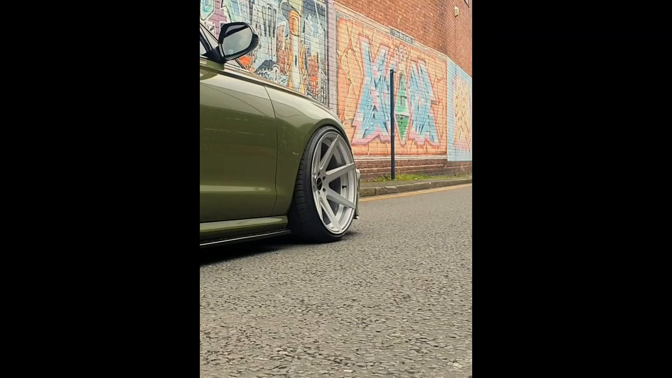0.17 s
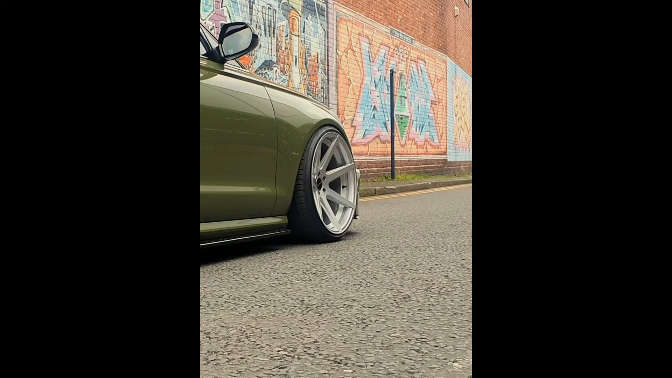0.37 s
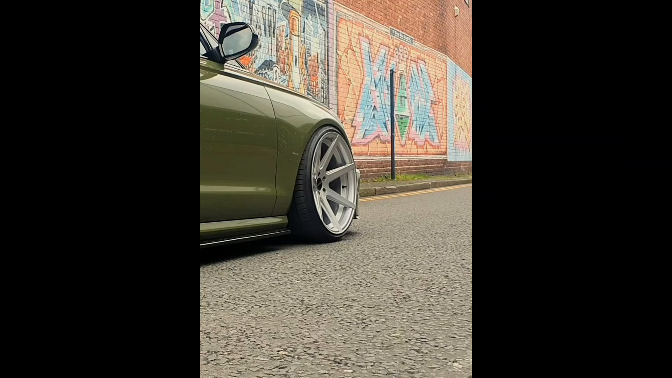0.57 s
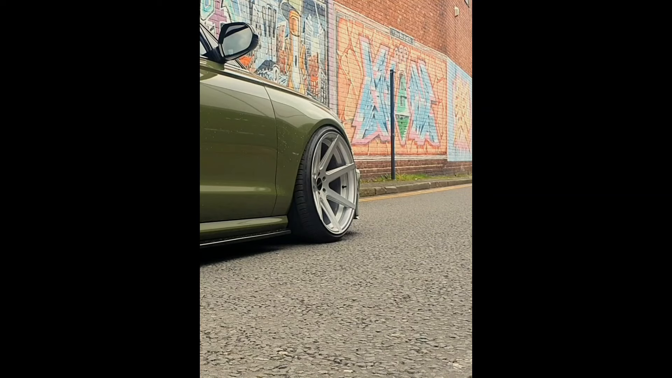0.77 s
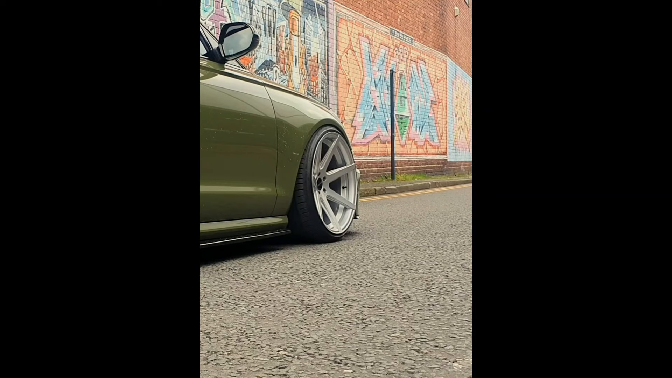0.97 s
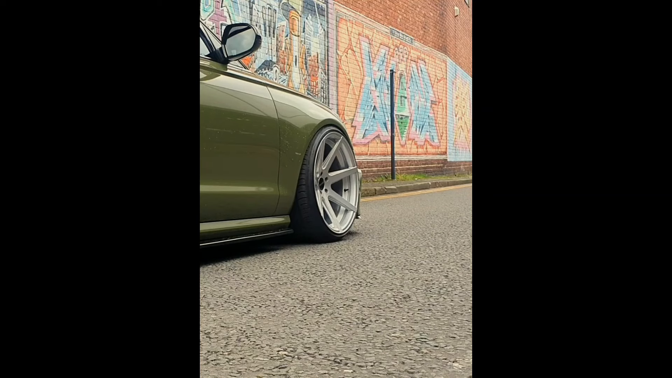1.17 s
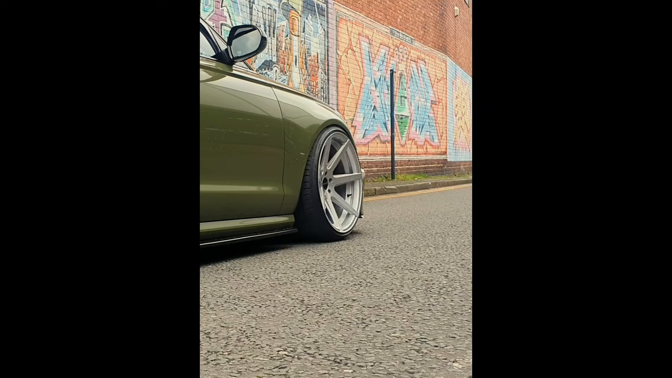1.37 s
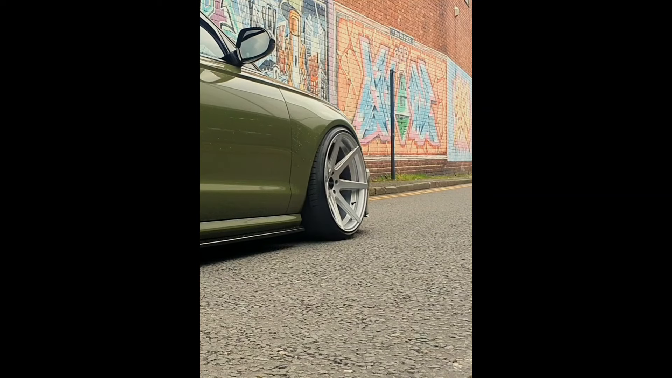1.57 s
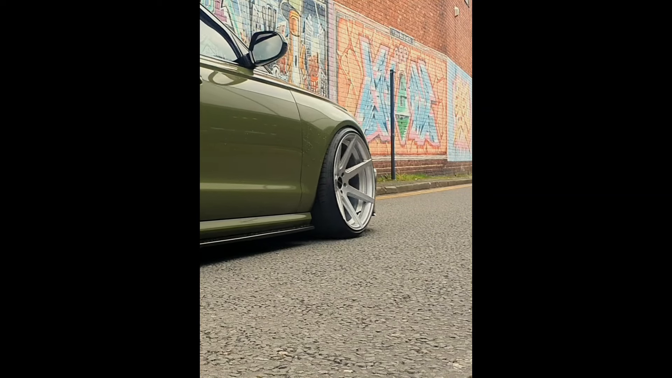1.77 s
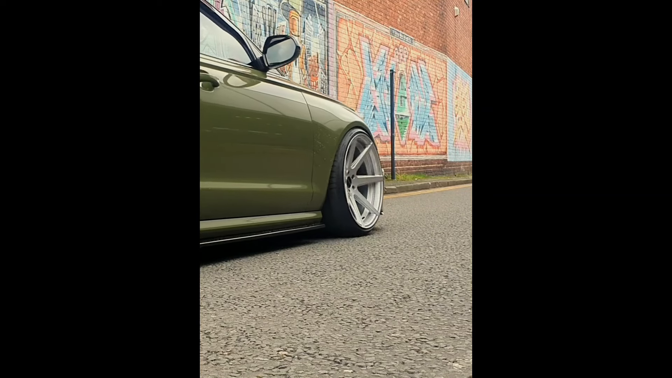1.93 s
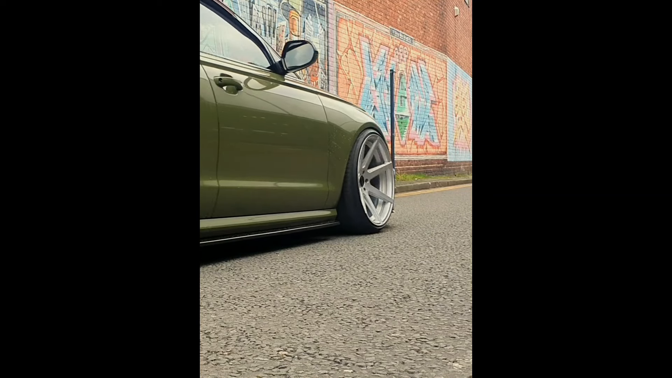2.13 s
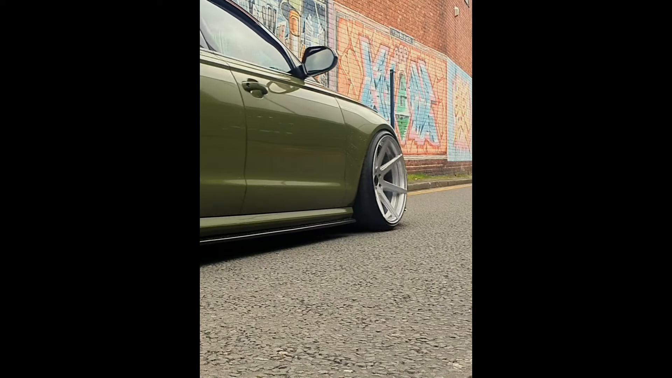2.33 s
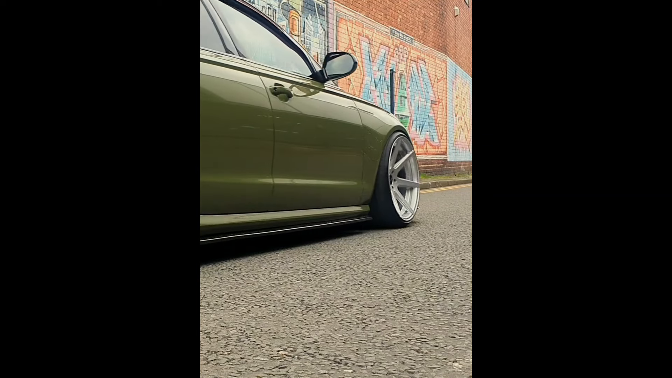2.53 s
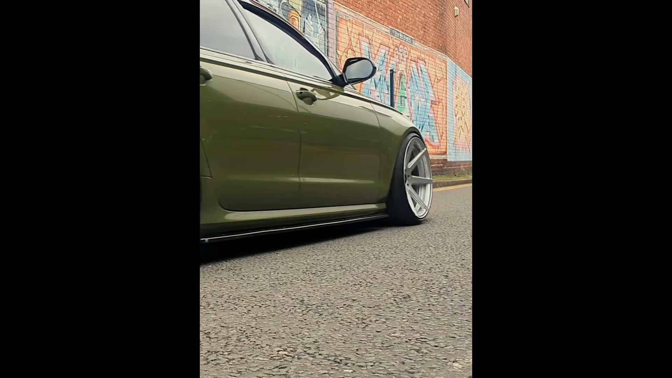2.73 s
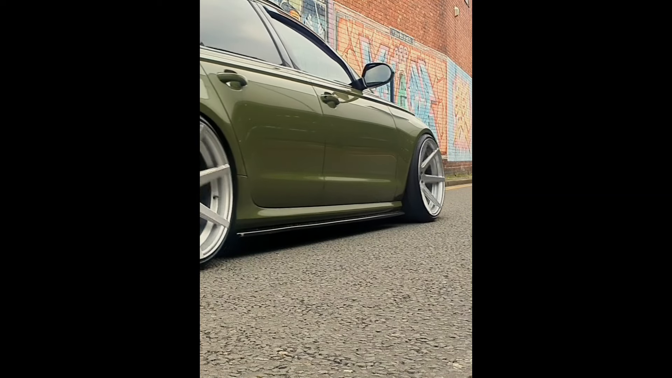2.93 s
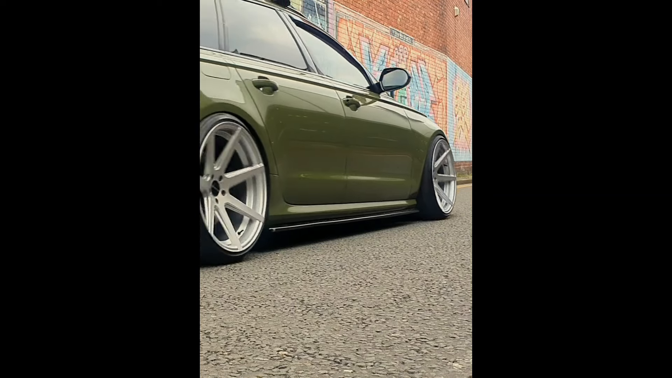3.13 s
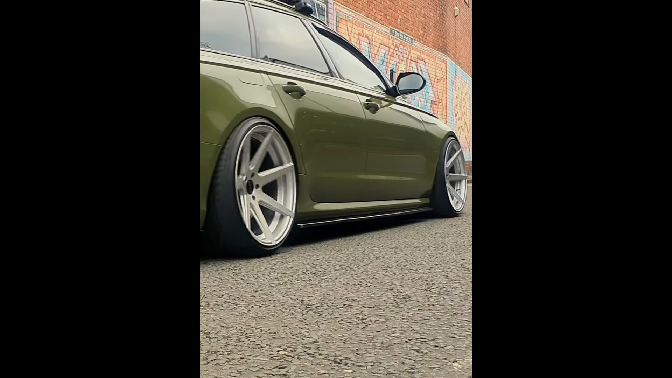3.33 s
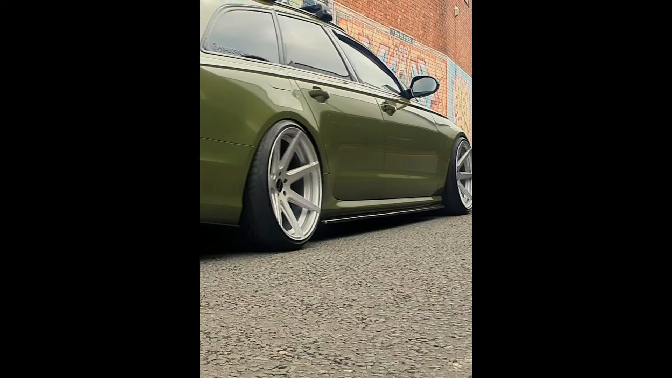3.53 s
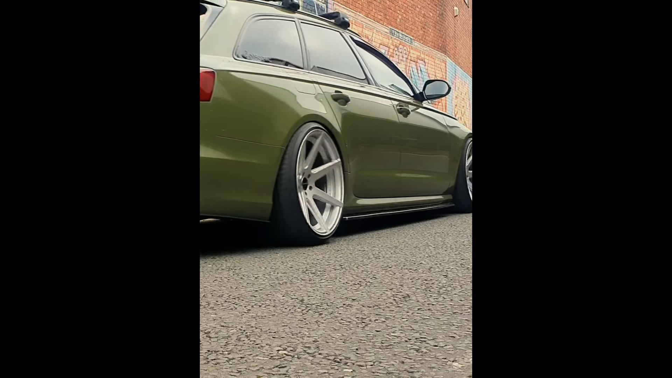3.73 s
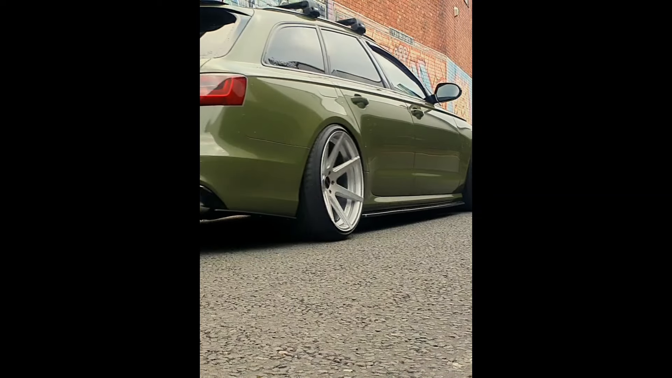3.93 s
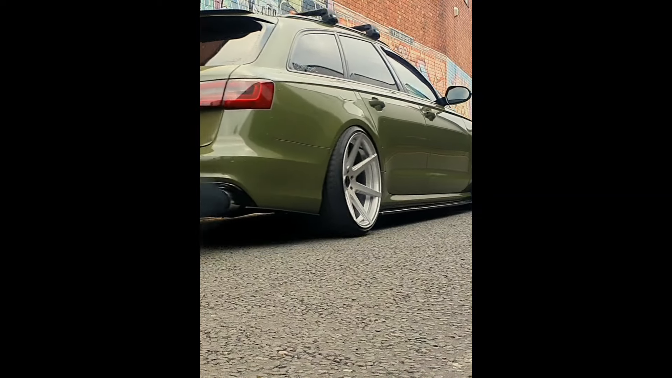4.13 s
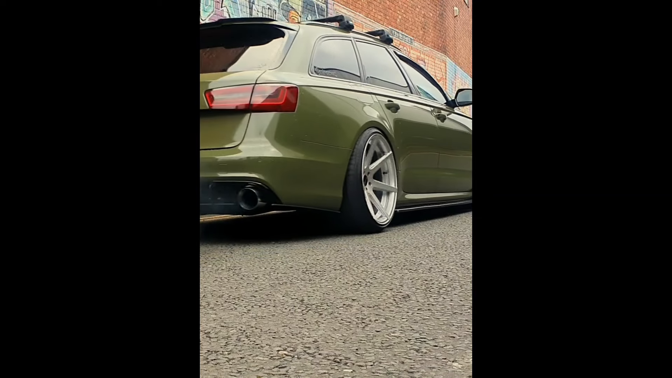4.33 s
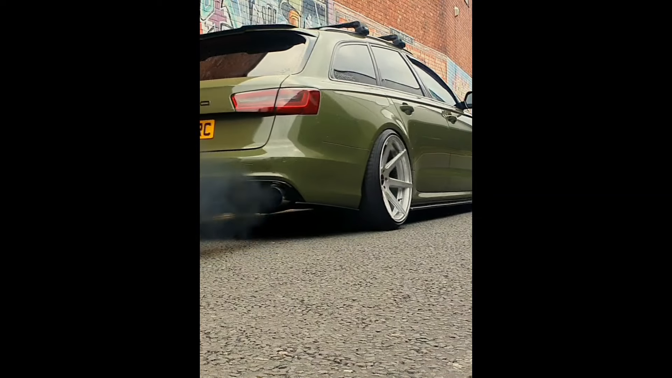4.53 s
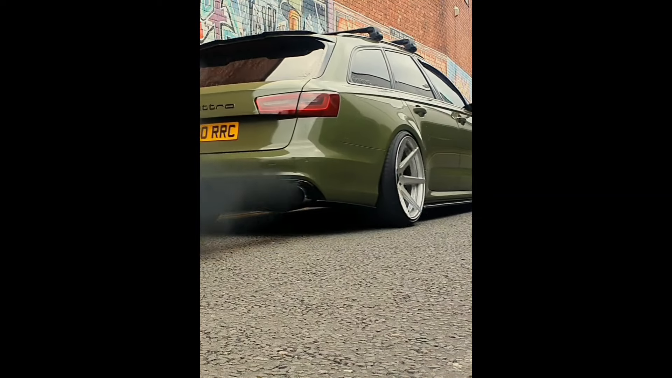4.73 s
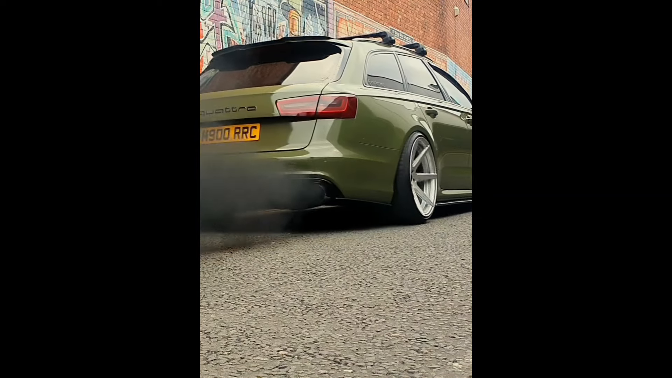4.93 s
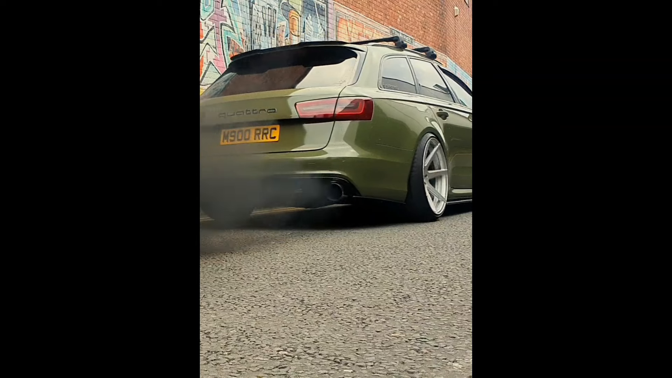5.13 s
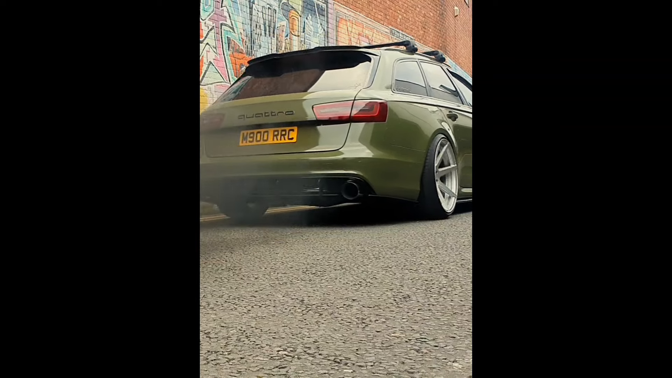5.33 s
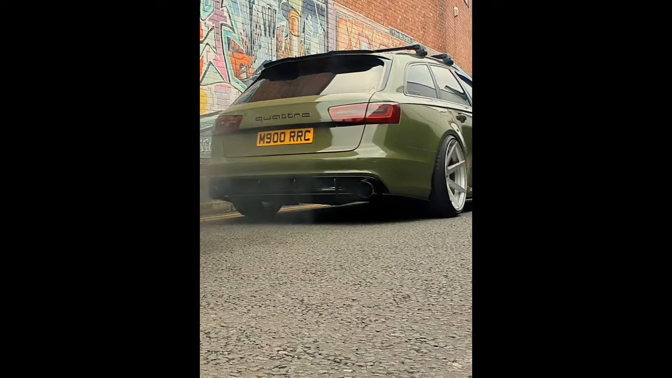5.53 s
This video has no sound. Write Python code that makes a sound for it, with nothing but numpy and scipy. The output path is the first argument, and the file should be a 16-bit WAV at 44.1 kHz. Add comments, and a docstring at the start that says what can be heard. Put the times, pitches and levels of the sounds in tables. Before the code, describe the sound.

Steady rumbling diesel idle through a loud exhaust, then a sudden floored throttle, turbo rush, limiter pops and a final clean blare.

```python
"""A six-cylinder diesel with an open exhaust idles in a walled street while the microphone moves from nose to tail.
Each firing feeds the pipe: slow ones hum as harmonics, fast ones are pulses ringing it, with rasp and hiss.
The driver floors it: the turbo rushes, the revs shoot up to the limiter, and unburnt fuel bangs and crackles.
Then the revs sag and the engine pulls again with a clean blare. Behind it, at idle only, are clattering metal,
intake air, a turbo whisper and a gear whine. The loud sounds echo off the street."""
import sys
import numpy as np
from scipy import signal
from scipy.fft import rfft, irfft, next_fast_len
from scipy.io import wavfile
from scipy.ndimage import uniform_filter1d

SR = 44100
rng = np.random.default_rng(int(sys.argv[2]) if len(sys.argv) > 2 else 0)


def inscribe(sig):
    """Save sig as 16-bit PCM at rate SR to the path in sys.argv[1].

    A 1-D sig is mono; a 2-D sig holds one channel per row.
    Samples are clipped to [-1, 1] before scaling.
    """
    pcm = np.round(np.clip(np.atleast_2d(sig).T, -1, 1) * 32767)
    wavfile.write(sys.argv[1], SR, pcm.astype(np.int16))


N = 251237
TIME = np.arange(N) / SR

# Engine speed at idle. Each row: time in seconds, firings per second.
IDLE_SPEED = [(0, 41.4), (.4, 41.9), (.95, 41.7), (1.2, 41.1), (1.6, 40.8), (1.85, 40.5), (2.05, 40.1),
              (2.32, 41.5), (2.65, 43.5), (3.13, 42.4), (3.3, 41.5), (3.48, 44.8)]
# Engine speed under throttle. Each row: time in seconds, firings per second, unevenness from 0 to 1.
REV_SPEED = [(3.51, 59, 0.5), (3.56, 85.5, 0.47), (3.63, 100, 0.39), (3.81, 156.5, 0.48), (4.0, 208.6, .25),
             (4.098, 259, .45), (4.289, 246, 0.71), (4.5, 235, 0.48), (4.619, 276, 0.95), (4.749, 246, .8),
             (4.851, 272, 0.58), (5.18, 270, 0.79), (5.299, 245, 0.6), (5.5, 225, 0.37), (5.7, 216, 0.01)]
# Load on the engine once the throttle is open. Each row: time in seconds, load in dB (0 is full).
LOAD = [(3.42, -28.5), (3.52, -1.5), (3.63, -0.5), (3.74, -0.5), (3.83, 1), (3.93, -6), (4.01, 1),
        (4.18, -13), (4.54, -6), (5.15, -7.5), (5.3, -13.5), (5.53, -16), (5.62, -6.5), (5.7, 0.5)]
# How the exhaust pipe colours the pulses. Each row: frequency in Hz, level in dB.
PIPE_COLOUR = [(25, -56.5), (70, -24), (150, -10), (270, 1.5), (370, -2), (500, 9), (680, 0), (900, -14),
               (1060, -3.5), (1180, -21), (1350, -12.5), (1800, -20), (2500, -31), (6000, -35.5),
               (8500, -85.5), (16000, -100)]
# How strongly the pipe passes the three lowest harmonics. Each row: frequency in Hz, level in dB.
NOTE_COLOUR = [(60, -2.5), (106, -2.5), (132, -13), (178, 1), (210, 0), (240, -4.5), (315, -5.5),
               (380, -24), (500, -13.5), (580, -19), (660, -4), (780, -21)]
# Colour of the rough exhaust rasp. Each row: frequency in Hz, level in dB.
RASP_COLOUR = [(25, -39), (130, -17), (280, 15), (400, 1.5), (700, 8), (1400, -6), (2100, -6.5),
               (2700, -12), (5000, -30.5), (8200, -41), (12000, -40), (16000, -41)]
# Colour of the exhaust hiss, intake air and tick. Each row: frequency in Hz, level in dB.
HISS_COLOUR = [(1500, -25.5), (2600, -10), (3200, 7), (4400, 2), (5800, -2.5), (6700, -6), (7800, -46),
               (10500, -16), (13000, -26), (16000, -30.5)]
# Bangs in the pipe. Each row: time in seconds, crack level in dB, boom level in dB.
BANGS = [(4.0034, -27.5, -21), (4.0746, -33, -9), (4.0989, -38, -13), (4.1315, -32.5, -21.5),
         (4.17, -54, -17.5), (4.2091, -22.5, -7), (4.2567, -25.5, -15.5), (4.353, -25, -12),
         (4.4019, -29.5, -11), (4.5237, -22, -14), (4.537, -26, -10), (4.6129, -20, -12.5),
         (4.6543, -21, -28), (4.6726, -21, -12), (4.7213, -27, -17.5), (4.7713, -20, -10.5),
         (4.8193, -26.5, -13.5), (4.849, -33, -16), (4.8949, -20.5, -9.5), (4.9198, -35, -16),
         (4.9505, -25.5, -38), (4.968, -19, -12), (5.0353, -24.5, -11.5), (5.0859, -34, -17),
         (5.1155, -24, -11), (5.1527, -20.5, -10), (5.2105, -28.5, -15)]
# Colour of a bang's boom. Each row: frequency in Hz, level in dB.
BOOM_COLOUR = [(25, -36.5), (75, -7), (150, -16), (275, 5.5), (370, -17), (520, -2), (660, 0.5),
               (820, -6.5), (1100, -16.5), (2000, -23), (3000, -30.5), (7000, -60)]
# Colour of a bang's crack. Each row: frequency in Hz, level in dB.
CRACK_COLOUR = [(400, -4.5), (1000, 10.5), (2000, 8.5), (2800, 0), (4500, 4), (6200, 2), (7200, -8),
                (8200, -45), (16000, -36)]
# Colour of the snap on top of a crack. Each row: frequency in Hz, level in dB.
SNAP_COLOUR = [(3000, -34), (7000, -3.5), (9000, -2.5), (11500, 4.5), (15000, 1), (17000, -18)]
# Colour of the turbo's rush. Each row: frequency in Hz, level in dB.
RUSH_COLOUR = [(300, -22.5), (1000, 4), (1180, 0.5), (1420, 9.5), (1750, 0.5), (2450, -8), (2900, -0.5),
               (3300, 5), (4400, -6), (5400, 0), (6400, -16), (7600, -30), (10500, -18.5), (16000, -29.5)]
# Idle drone on the pipe's resonance. Each row: time in seconds, level in dB, depth of its beat in dB.
DRONE = [(0, -20.5, 1.5), (.85, -20.5, 3), (1.15, -17, 1.5), (1.55, -16.5, 1.5), (1.8, -18.5, 1.5),
         (2.15, -16, -0.3), (2.55, -19.5, 1), (3.1, -20.5, .6), (3.43, -18, 0.2), (3.5, -15.5, 2.5)]
# Brief sags of the drone. Each row: time in seconds, half length in seconds, depth in dB.
SAGS = [(0.232, 0.015, 8), (0.803, 0.013, 13), (.975, 0.031, 6), (1.942, 0.073, 12.5), (2.292, 0.028, 21),
        (2.4, .015, 17)]
# Idle throb. Each row: time in seconds, gain of the mixed harmonics in dB, sixth harmonic in dB.
THROB = [(0, -39.5, -36.5), (.5, -38.5, -29), (1.05, -34, -28.5), (1.5, -32.5, -41), (1.85, -32, -43.5),
         (2.3, -29.5, -27.5), (2.7, -29, -36), (3.12, -32.5, -41), (3.26, -24.5, -25), (3.5, -23, -40)]
# Harmonics mixed into the throb. Each row: multiple of the firing rate, level in the mix in dB.
IDLE_ORDERS = [(1, -27), (2, 1.5), (3, -2.5), (5, -3), (7, -8.5), (8, -18), (9, -19), (10, -16), (11, -18)]
# Colour of the idle rumble. Each row: frequency in Hz, level in dB.
RUMBLE_COLOUR = [(25, -13), (45, -0.5), (70, 9.5), (110, -8), (200, 6.5), (330, -6.5), (600, -18),
                 (1000, -22), (2000, -61.5)]
# Colour of the injector clatter. Each row: frequency in Hz, level in dB.
CLATTER_COLOUR = [(190, -28.5), (330, -2.5), (352, -13.5), (442, -4), (583, -6), (622, -1), (833, -8),
                  (1270, -8.5), (2000, -12), (2470, -16.5), (3210, -12.5), (3590, -32), (4970, -44.5),
                  (7960, -50), (16000, -45.5)]
# The engine's ringing metal parts. Each row: frequency in Hz, width in Hz, level in the mix in dB.
METAL = [(616, 43, -6), (900, 82, 1.5), (1670, 40, -2), (1946, 52, 2), (2102, 56, 0.5), (2290, 75, -5),
         (3120, 52, -7.5), (3260, 100, -5), (4050, 68, -10.5), (4720, 66, -16.5)]
# Intake air hiss. Each row: time in seconds, level in dB.
AIR = [(.33, -71), (.5, -51), (1, -57.5), (1.8, -62), (2.3, -55), (3.18, -53), (3.26, -62.5), (3.44, -55)]
# Turbo spooling at idle. Each row: time in seconds, centre in Hz, level in dB before a 6 dB lift.
SPOOL = [(0, 2780, -73.5), (1.9, 3430, -59.5), (2.4, 3960, -57), (2.8, 4570, -53), (3.18, 5108, -56.5),
         (3.25, 4988, -71), (5.7, 5060, -86)]
# A gear's whine, tied to the crankshaft. Each row: time in seconds, level in dB before a 2 dB lift.
WHINE = [(0, -58), (1.6, -51.5), (2, -45.5), (2.65, -45.5), (3, -56), (3.25, -79)]
# Hard echoes off the road and the bodywork. Each row: delay in milliseconds, level in dB.
ECHOES = [(2.3, -15.5), (7.4, -23), (13, -15.5)]
# The car seen from the microphone. Each row: time in seconds, lead of the left ear in ms, left-right in dB.
BEARING = [(0, 0.44, 2), (1.7, 0.39, 2.5), (2.7, 0.33, 2.5), (3.3, 0.15, 1.7), (4.2, 0, 2),
           (4.8, -0.052, 1.5), (5.7, 0.009, 1)]
# Difference in colour between the microphone ports. Each row: frequency in Hz, left minus right in dB.
PORT_TILT = [(100, -2), (500, -0.5), (1200, 0), (2400, 0), (4400, -3.5), (7500, -13), (11000, -2.5),
             (16000, -3)]

FLOORED_S, TURBO_LAG_S, LAG_LOSS_DB = 3.508, 0.076, 14   # the bark is held back until the boost builds
FULL_SPEED_HZ, BLUNT_SPEED_HZ = 228.3, 132   # firing rates at which the pulses are sharp, and blunt
# Levels are for full load. FOLLOWS is the share of the load's swing that a sound takes on.
BARK_DB, NOTE_DB = -11.5, -7
NOTE_FOLLOWS, NOTE_FADE_DB_PER_S = 0.23, 4.5   # the deep note thins as the run goes on
# Rasp and hiss levels are also for full speed, and grow with every octave of speed.
RASP_DB, RASP_FOLLOWS, RASP_DB_PER_OCTAVE = -22.5, 0.46, 13
HISS_DB, HISS_FOLLOWS, HISS_DB_PER_OCTAVE = -36.5, .75, 11
BITE_FOLLOWS, BITE_HZ = 1.8, 900   # near full load, treble from here up is added to the bark
CUT_DB, CUT_S = 3.5, 0.016   # the limiter starves the engine before each bang
SURGE_DB, SURGE_S = 1, 0.016   # and the flow surges after it
GAS_GRAIN = 1.86   # spikiness of the gas behind a bang; 1 is smooth noise
# Snap level for a crack of SNAP_FROM_DB, and dB of snap gained per dB of crack.
SNAP_DB, SNAP_GROWTH, SNAP_FROM_DB = -32.5, 2.2, -20
# The engine bounces off the limiter: start, build-up, length and dying away, in seconds.
LIMITER_S, LIMITER_ATTACK_S, LIMITER_HOLD_S, LIMITER_RELEASE_S = 4.22, .35, 1.0, .2
CRACKLE_PER_S, CRACKLE_BOOM_DB, CRACKLE_CRACK_DB = 88, -31.5, -58   # small after-bangs meanwhile
LURCH = .035   # the crankshaft's swing meanwhile, as a share of its speed
# The turbo's rush as the throttle opens.
BOOST_S, BOOST_ATTACK_S, BOOST_HOLD_S, BOOST_RELEASE_S, BOOST_DB = 3.485, 0.076, 0.17, 0.32, -28.5
CYLINDERS = 6
BEAT_PEAK_TURNS = 0.29   # the drone beats once per engine cycle, peaking at this point of it
# The eighth harmonic swells once.
SWELL_S, SWELL_ATTACK_S, SWELL_HOLD_S, SWELL_RELEASE_S, SWELL_DB = 1.85, 0.068, 0.22, 0.28, -34
CLATTER_DB, METAL_DB = -39.5, -45.5   # in the open engine bay
SHADE_S, SHADE_FADE_S = 3.18, 0.052   # then the bay's treble falls away as the car's body hides it
SHADE_DB, SHADE_HZ = 20, 1050   # loss on the ringing metal; clatter is left below this
TICK_S, TICK_DB = .441, -30
GEAR_MULTIPLE = 68   # gear teeth passing per firing
MIC_LOW_CUT_HZ, TOP_STOP_HZ = 47, 17200   # the treble is gone from the second one up


def exhaust(firings):
    """Under load each firing is a pressure pulse that rings the pipe and drags a puff of turbulence behind it."""
    speed, uneven = in_time(REV_SPEED)
    load_db, = in_time(LOAD)
    octaves = np.log2(speed / FULL_SPEED_HZ)
    floored_s = np.maximum(TIME - FLOORED_S, 0)
    at = np.flatnonzero(np.diff(np.floor(firings)))
    chance = rng.standard_normal((len(at), 2))

    # unequal cylinders put lines between the harmonics; misfires scatter the timing
    cylinder_db = np.resize([12.0, -3.5, -1, -8, 9.5, 9.5], len(at))
    late = uneven[at] ** 1.5 * SR * .00065 * chance[:, 0]
    places = np.clip(np.round(at + late).astype(int), 0, N - 1)
    pulses = np.zeros(N)
    pulses[places] = from_db(uneven[at] * (cylinder_db + 3.7 * chance[:, 1]))

    # the pulses sharpen as the revs rise
    sharp = np.clip((speed - BLUNT_SPEED_HZ) / (FULL_SPEED_HZ - BLUNT_SPEED_HZ), 0, 1) ** 2
    blunt_pulses = uniform_filter1d(pulses, size=21)
    bark = colour(sharp * pulses + (1 - sharp) * blunt_pulses, PIPE_COLOUR)
    bark /= np.sqrt(np.abs(uniform_filter1d(bark ** 2, size=2200)) + 1e-12)   # even out the loudness
    treble = signal.sosfilt(signal.butter(1, BITE_HZ, "high", fs=SR, output="sos"), bark)
    bark = bark + sharp * from_db(BITE_FOLLOWS * np.minimum(load_db, 0)) * treble

    # the more uneven the firings, the more the bark surges and sinks
    lag_db = LAG_LOSS_DB * np.exp(-floored_s / TURBO_LAG_S)
    bark *= from_db(BARK_DB + load_db - lag_db + uneven * (5.6 * drift(34) - 6.5))

    stumble = 3.15 * uneven ** 2
    note = 0
    for k in range(1, 4):
        turn = 2 * np.pi * k * firings + stumble * drift(25)
        note = note + from_db(at_hz(NOTE_COLOUR, k * speed)) * np.cos(turn)
    note *= from_db(NOTE_DB + NOTE_FOLLOWS * load_db - NOTE_FADE_DB_PER_S * floored_s)

    rasp = noise(RASP_COLOUR, alike=0.17) * puffs(firings, depth_db=5.5)
    rasp *= from_db(RASP_DB + RASP_FOLLOWS * load_db + RASP_DB_PER_OCTAVE * octaves)
    hiss = noise(HISS_COLOUR, alike=0.23) * puffs(firings, depth_db=10)
    hiss *= from_db(HISS_DB + HISS_FOLLOWS * load_db + HISS_DB_PER_OCTAVE * octaves)
    return (bark + note + rasp + hiss) * fuel_cut()


def fuel_cut():
    """The limiter starves the engine for a moment before each bang; afterwards the flow surges."""
    starved = np.max([(TIME < s) * np.exp(-abs(TIME - s) / CUT_S) for s, *_ in BANGS], axis=0)
    surge = np.max([(TIME >= s) * np.exp(-abs(TIME - s) / SURGE_S) for s, *_ in BANGS], axis=0)
    return from_db(uniform_filter1d(SURGE_DB * surge - CUT_DB * starved, size=90))


def bangs():
    """Fuel ignites in the hot pipe: a ringing boom with a sharp crack; the hardest cracks steepen into a snap."""
    out = np.zeros((2, N))
    heats = np.exp(.07 * rng.standard_normal(len(BANGS)))
    for (s, crack_db, boom_db), heat in zip(BANGS, heats):
        # the heat of the gas shifts the pipe's resonances from bang to bang
        pipe = [(hz * heat, db) for hz, db in BOOM_COLOUR]
        boom = from_db(boom_db) * blast(pipe, echo_db=-5.5, gas_db=-19.5, gas_t60=0.16)
        crack = from_db(crack_db) * blast(CRACK_COLOUR, echo_db=-4.5, gas_db=-21.0, gas_t60=0.053)
        snap = np.array([blast(SNAP_COLOUR, echo_db=-6, gas_db=-29.5, gas_t60=0.15) for ear in range(2)])
        snap *= from_db(SNAP_DB + SNAP_GROWTH * (crack_db - SNAP_FROM_DB))
        start = round(s * SR)
        out[:, start:start + len(boom)] += (boom + crack + snap)[:, :N - start]
    return out


def blast(spectrum, echo_db, gas_db, gas_t60):
    """A shock bounces up and down the pipe, with a dying, crackly rush of gas; unit rms over its first 10 ms."""
    age = TIME[:SR // 4]
    gas = rng.standard_normal(len(age))
    spiky_gas = rms_one(np.sign(gas) * np.abs(gas) ** GAS_GRAIN)
    wave = from_db(gas_db - 60 * age / gas_t60) * spiky_gas
    trips = np.cumsum(rng.uniform(0.00159, .0042, size=5))   # return times in seconds
    wave[0] += 1
    wave[(trips * SR).astype(int)] += from_db(echo_db * (0.5 + np.arange(len(trips))))
    wave = colour(wave, spectrum)
    return wave / np.sqrt(np.mean(wave[:SR // 100] ** 2))


def crackle(limiting):
    """Small pockets of fuel go off at random between the big bangs."""
    sizes = from_db(8.0 * np.minimum(rng.exponential(1, N), 2))
    shocks = sizes * (rng.random(N) < limiting * CRACKLE_PER_S / SR)
    booms = from_db(CRACKLE_BOOM_DB) * rms_one(colour(shocks, BOOM_COLOUR))
    cracks = from_db(CRACKLE_CRACK_DB) * rms_one(colour(shocks, CRACK_COLOUR))
    return booms + cracks


def first_knock():
    """The first firing with full fuel knocks hard in the block: a noise burst rings two resonances."""
    knock = rng.standard_normal(N) * (TIME > 3.485) * np.exp(-abs(TIME - 3.485) / .006)
    low_ring = from_db(3.5) * resonance(knock, hz=970, width=52)
    high_ring = from_db(-25) * resonance(knock, hz=1410, width=280)
    return low_ring + high_ring


def turbo(firings):
    """A rush of air as the boost builds, chopped by the firings."""
    boost = swell(BOOST_S, BOOST_ATTACK_S, BOOST_HOLD_S, BOOST_RELEASE_S)
    return from_db(BOOST_DB) * boost * noise(RUSH_COLOUR, alike=0.1) * puffs(firings, depth_db=2)


def idle(firings):
    """Slow firings: the pipe picks out their fourth harmonic, over a lumpy rumble."""
    throb_db, sixth_db = in_time(THROB)
    drone = from_db(drone_level(firings)) * harmonic(firings, multiple=4, waver=.04)
    sixth = from_db(sixth_db) * harmonic(firings, multiple=6, waver=.12)
    eighth = from_db(SWELL_DB) * harmonic(firings, multiple=8, waver=.1)
    eighth *= swell(SWELL_S, SWELL_ATTACK_S, SWELL_HOLD_S, SWELL_RELEASE_S)
    throb = sum(from_db(db) * harmonic(firings, k, waver=0.5) for k, db in IDLE_ORDERS)
    rumble = noise(RUMBLE_COLOUR, alike=1.0) * from_db(-21.0 + .3 * throb_db)
    return drone + sixth + eighth + from_db(throb_db) * throb + rumble


def drone_level(firings):
    """The drone beats with the engine cycle and sags now and then; in dB."""
    level_db, beat_db = in_time(DRONE)
    beat = np.cos(2 * np.pi * (firings / CYLINDERS - BEAT_PEAK_TURNS))
    sag_db = sum(db * np.exp(-((TIME - s) / half) ** 2) for s, half, db in SAGS)
    return level_db + beat_db * beat - sag_db


def engine_bay(firings):
    """Injector clatter and knocks ring the metal at each firing; with intake air, a turbo whisper and one tick."""
    air_db, = in_time(AIR)
    spool_hz, spool_db = in_time(SPOOL)
    shade = np.clip((TIME - SHADE_S) / SHADE_FADE_S, 0, 1)

    clatter = from_db(CLATTER_DB) * noise(CLATTER_COLOUR, alike=0.75) * puffs(firings, depth_db=2)
    dull_clatter = signal.sosfilt(signal.butter(1, SHADE_HZ, fs=SR, output="sos"), clatter)
    clatter = (1 - shade) * clatter + shade * dull_clatter

    knocks = rng.standard_normal((2, N)) * puffs(firings, depth_db=10)
    metal = rms_one(sum(from_db(db) * resonance(knocks, hz, width) for hz, width, db in METAL))
    metal = rms_one(colour(metal, [(300, -17.5), (600, 6.5), (5500, 2), (8000, -14.5)]))
    metal = from_db(METAL_DB - SHADE_DB * shade) * metal

    air = from_db(air_db) * noise(HISS_COLOUR, alike=.2) * puffs(firings, depth_db=2)
    spin = np.sin(2 * np.pi * np.cumsum(spool_hz) / SR)
    whisper = from_db(spool_db + 6) * np.array([drift(450), drift(450)]) * spin
    burst = rng.standard_normal(N) * (TIME > TICK_S) * np.exp(-abs(TIME - TICK_S) / 0.0026)
    tick = from_db(TICK_DB) * colour(burst, HISS_COLOUR)
    return clatter + metal + air + whisper + tick


def gear(firings):
    """A rough whine at the tooth rate, with a faint octave."""
    whine_db, = in_time(WHINE)
    turn = 2 * np.pi * GEAR_MULTIPLE * firings
    teeth = []
    for ear in range(2):
        whine = drift(90) * np.sin(turn)
        octave = from_db(-19) * drift(110) * np.sin(2 * turn)
        teeth.append(whine + octave)
    return from_db(whine_db + 2) * np.array(teeth)


def puffs(firings, depth_db):
    """Gain that rises quickly at each firing and sinks by depth_db until the next; unit rms."""
    gain = from_db(-depth_db * (firings % 1))
    return rms_one(uniform_filter1d(gain, size=24))


def harmonic(firings, multiple, waver):
    """One multiple of the firing rate at unit rms, wavering in strength and phase."""
    turn = 2 * np.pi * multiple * firings + multiple ** 2   # the square spreads the starting phases
    tone = (1 + waver * drift(3.4)) * np.cos(turn) + waver * drift(31) * np.sin(turn)
    return rms_one(tone)


def swell(start, attack, hold, release):
    """Envelope: rises 40 dB per attack time up to its start, holds at 1, then falls 40 dB per release time."""
    outside = np.maximum(start - TIME, 0) / attack + np.maximum(TIME - start - hold, 0) / release
    return from_db(-40 * np.minimum(outside, 4))


def resonance(x, hz, width):
    """Two-pole resonance of gain 1 on top."""
    r = np.exp(-np.pi * width / SR)
    top = np.array([1, 0, -1]) * (1 - r * r) / 2
    return signal.lfilter(top, [1, -2 * r * np.cos(2 * np.pi * hz / SR), r * r], x)


def noise(spectrum, alike):
    """Coloured stereo noise of unit rms, partly the same in both ears (alike is 0 to 1)."""
    mid, side = rng.standard_normal((2, N))
    both = np.sqrt(1 + alike) * mid + np.sqrt(1 - alike) * np.array([side, -side])
    return rms_one(colour(both, spectrum))


def colour(x, spectrum):
    """Causal (minimum-phase) filter with the given spectrum: it never sounds before its input."""
    length = x.shape[-1]
    half = next_fast_len(length // 2 + 2048)
    gain = from_db(at_hz(spectrum, np.linspace(0, SR / 2, half + 1)))
    cepstrum = irfft(np.log(gain))
    # folding the second half onto the first makes the filter causal
    cepstrum[1:half] *= 2
    cepstrum[half + 1:] = 0
    return irfft(rfft(x, 2 * half) * np.exp(rfft(cepstrum)))[..., :length]


def drift(rate):
    """Smooth random wander of spread 1, up to about the given rate in Hz."""
    r = np.exp(-80 * np.pi * rate / SR)   # worked out at every 40th sample
    slow = signal.lfilter([1], [1, -2 * r, r * r], rng.standard_normal(N // 40 + 2002))[2000:]
    return np.interp(np.arange(N) / 40, np.arange(len(slow)), rms_one(slow))


def in_time(rows):
    """Each column of a curve at every sample."""
    s, *columns = np.transpose(rows)
    return [np.interp(TIME, s, c) for c in columns]


def at_hz(points, hz):
    """Read a spectrum on a log-frequency axis."""
    f, db = np.transpose(points)
    return np.interp(np.log(hz + 1), np.log(f), db)


def from_db(db):
    """Decibels to gain."""
    return 10 ** (np.asarray(db) / 20)


def rms_one(x):
    """Scale to unit rms."""
    return x / np.sqrt(np.mean(x ** 2) + 1e-20)


def street(x, wet_db, t60):
    """A few hard echoes, then scatter from the brick wall, different in each ear and thin in the bass."""
    bounce = colour(x, [(200, -20.0), (500, -1.5), (3000, -17), (12000, -11.5)])
    near = 0
    for ms, db in ECHOES:
        delay = round(ms * SR / 1000)
        near = near + from_db(db) * np.pad(bounce, ((0, 0), (delay, 0)))[:, :N]
    age = TIME[:SR // 2]
    tail = rng.standard_normal((2, len(age))) * from_db(-60 * age / t60) * (age > .002)
    tail /= np.sqrt(np.sum(tail ** 2, axis=1, keepdims=True))
    tail = colour(tail, [(100, -23.0), (300, -6.5), (600, -2), (1200, 0.5), (4000, -1.0), (14000, -8.5)])
    return x + near + from_db(wet_db) * signal.fftconvolve(x, tail, axes=1)[:, :N]


def place(x):
    """The sound reaches the nearer microphone port first, and each port has its own colour."""
    lead_ms, pan_db = in_time(BEARING)
    left = colour(x[0], [(hz, db / 2) for hz, db in PORT_TILT]) * from_db(pan_db / 2)
    right = colour(x[1], [(hz, -db / 2) for hz, db in PORT_TILT]) * from_db(-pan_db / 2)
    return np.array([left, np.interp(TIME - lead_ms / 1000, TIME, right)])


def scene():
    """One crankshaft drives everything; the throttle hands over from the idle to the roar."""
    speed, = in_time(list(IDLE_SPEED) + [row[:2] for row in REV_SPEED])
    # the crankshaft lurches while it bounces off the limiter
    limiting = swell(LIMITER_S, LIMITER_ATTACK_S, LIMITER_HOLD_S, LIMITER_RELEASE_S)
    firings = np.cumsum(speed * (1 + LURCH * limiting * drift(14))) / SR   # running count
    throttle = np.clip((TIME - 3.42) / 0.099, 0, 1)
    idling, = in_time([(3.47, 0.99), (3.54, 0.059)])
    pull = throttle * (exhaust(firings) + turbo(firings))
    roar = street(pull + first_knock() + bangs() + crackle(limiting), wet_db=-4.5, t60=0.2)
    quiet = idling * (idle(firings) + engine_bay(firings) + gear(firings))
    return place(quiet + roar)


def record(dry):
    """The microphone thins the deepest bass, the loudest peaks are rounded, the top is cut, the ends are eased."""
    heard = signal.sosfilt(signal.butter(2, MIC_LOW_CUT_HZ, "high", fs=SR, output="sos"), dry)
    rounded = heard / (1 + heard ** 6) ** (1 / 6)
    eased = rounded * np.clip(np.minimum(TIME, TIME[-1] - TIME) / .004, 0, 1)
    return signal.sosfilt(signal.cheby2(14, 70, TOP_STOP_HZ, fs=SR, output="sos"), eased)


dry = scene()
out = record(dry)
inscribe(out)
```